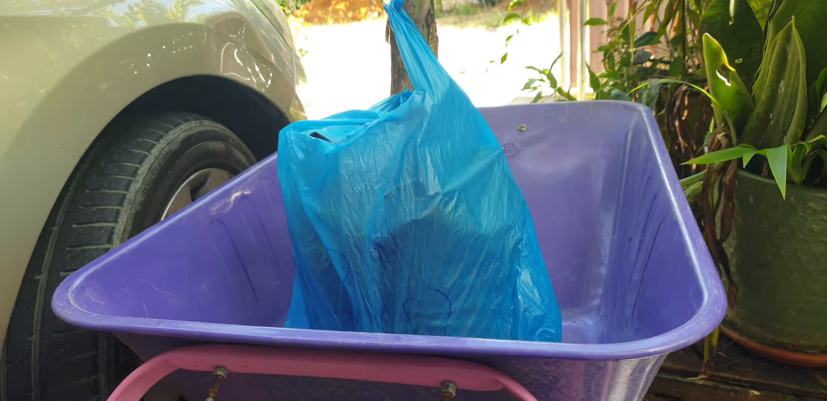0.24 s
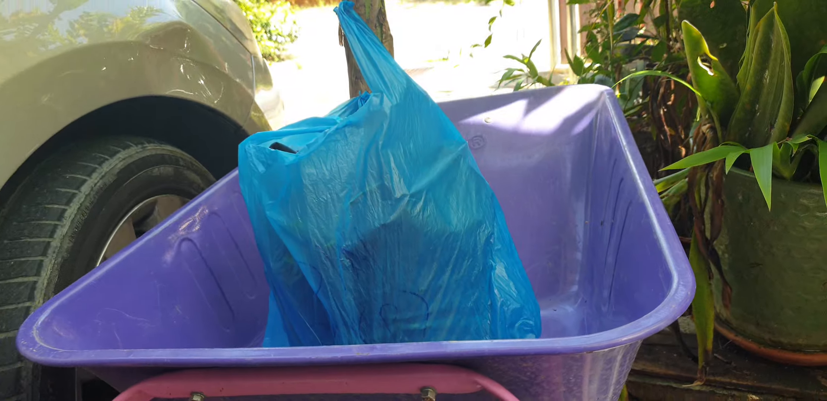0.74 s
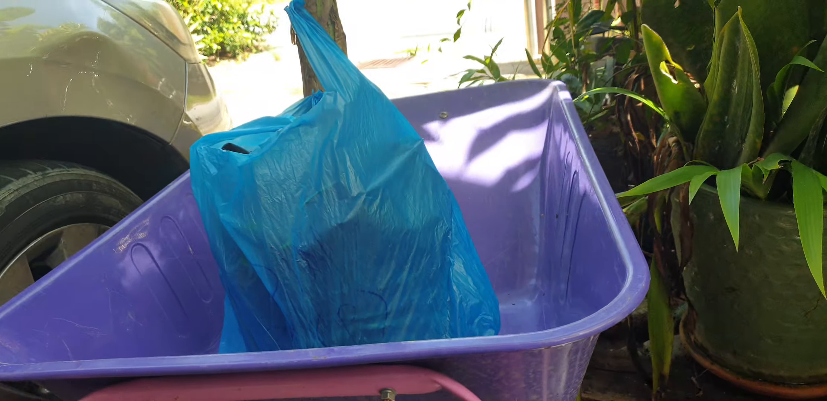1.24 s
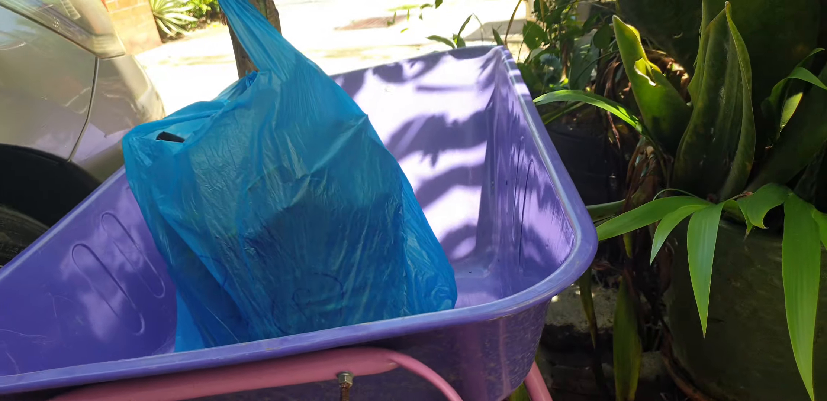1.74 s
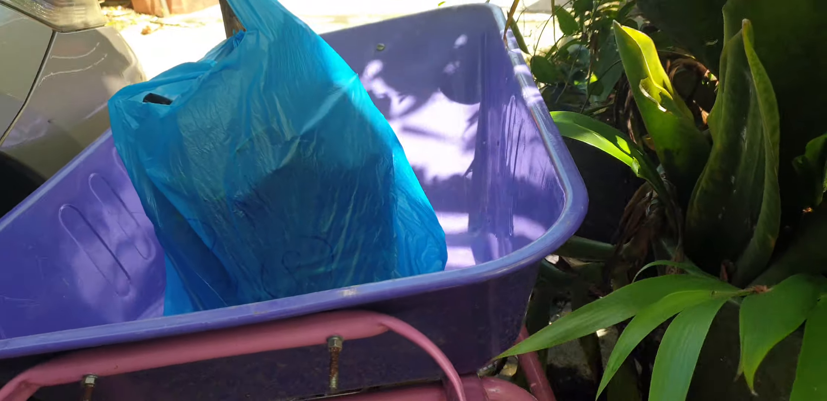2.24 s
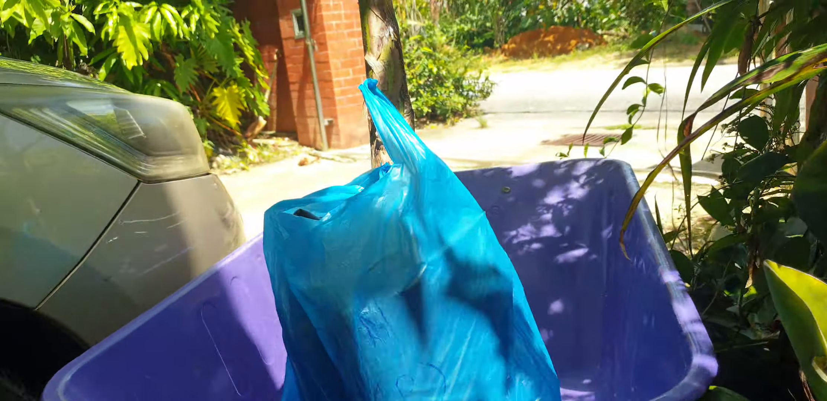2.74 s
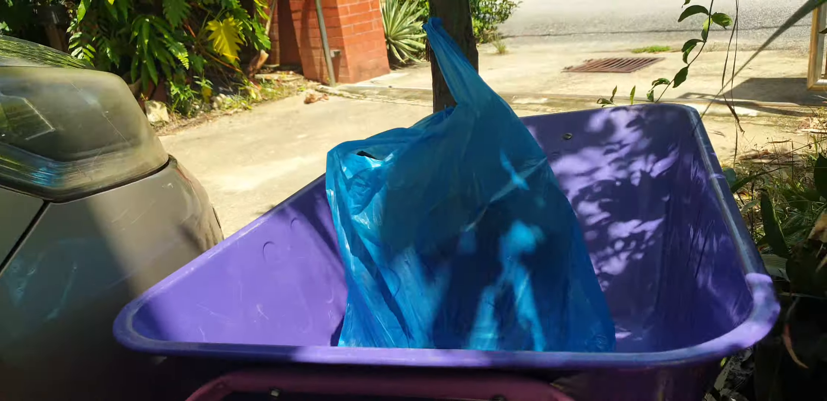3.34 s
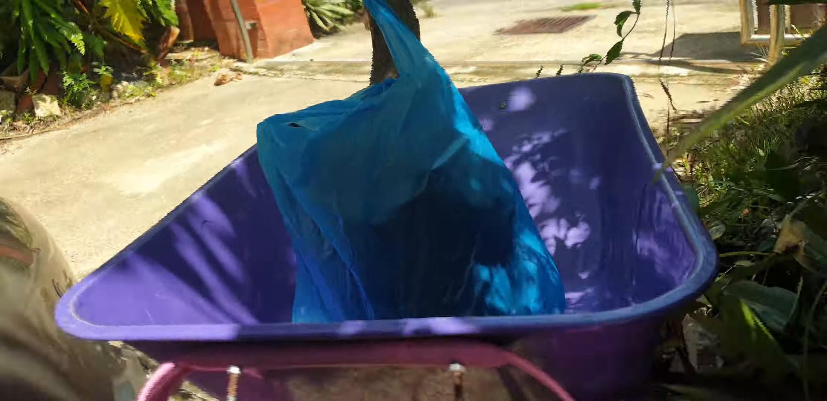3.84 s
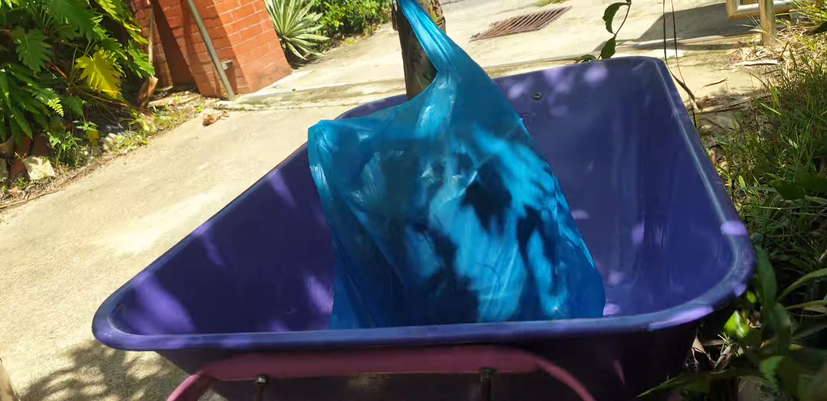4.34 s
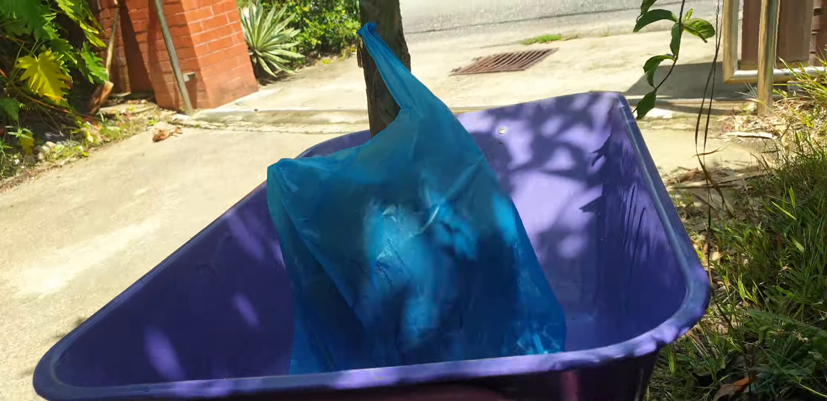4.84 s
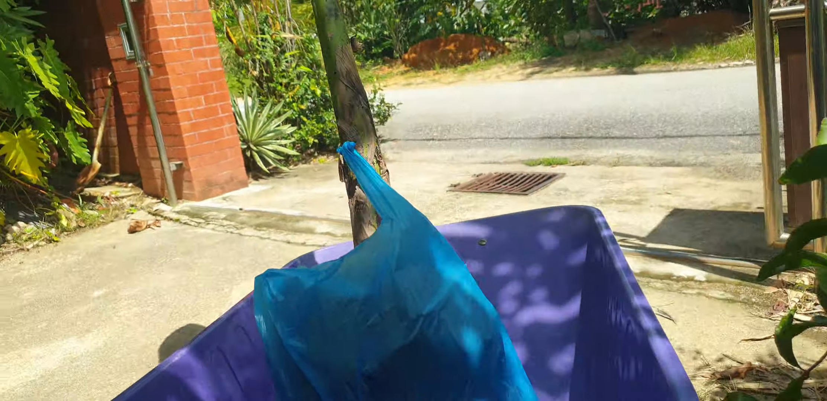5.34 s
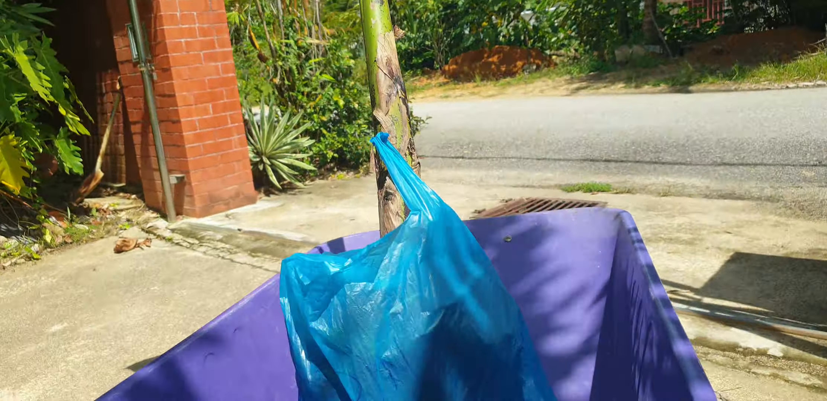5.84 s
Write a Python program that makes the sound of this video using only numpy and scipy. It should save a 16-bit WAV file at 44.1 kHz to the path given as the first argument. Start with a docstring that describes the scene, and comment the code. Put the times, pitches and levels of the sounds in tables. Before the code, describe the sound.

Close outdoor sound of a loaded barrow rolling: sparse grit crackle and scuffing steps under a faint hiss, with dull bumps on the handles. Two hard jolts, about one second apart, make the metal tray clang and drum with low rumble. A leg scrapes hoarsely, a finger rubs the microphone and snaps away, then lighter crunching and ticks continue.

```python
"""Grit crunches under tyre and shoes and a steel tray drums, as a loaded wheelbarrow is pushed over concrete.
Heard from a hand-held phone behind it, the wheel's drops and road jolts excite tray resonances and notes.
Grit is gated noise in three grain sizes, with short rings for single stones; a steel leg scrapes once.
The hand adds decaying knocks, a finger rub and low rumble, over a faint hum, squeaks and outdoor hiss."""
import sys
import numpy as np
from scipy import signal
from scipy.fft import rfft, irfft, next_fast_len
from scipy.io import wavfile
from scipy.ndimage import uniform_filter1d, map_coordinates

SR = 44100
rng = np.random.default_rng(int(sys.argv[2]) if len(sys.argv) > 2 else 0)


def file_out(sig):
    """Save sig as 16-bit WAV at sys.argv[1]."""
    # one column per channel
    cols = np.atleast_2d(sig).T
    # limit, then scale
    lim = np.clip(cols, -1, 1)
    pcm = np.round(lim * 32767).astype(np.int16)
    wavfile.write(sys.argv[1], SR, pcm)


N = 268128

# Levels in the tables are relative: each layer adds its own trim.
# rough road that shakes the tray: peak t/s, rise/s, low-mode T60/s, low modes level/dB, upper modes level/dB,
# first note level/dB, second note level/dB, higher notes level/dB
ROUGH_PATCHES = [(0.491, .03, 0.69, -47, -62, -40.5, -57, -75), (2.89, .015, .6, -34, -55, -60, -60, -72),
                 (2.974, 0.0089, 0.42, -22.5, -18.5, -47, -36, -34),
                 (3.02, .03, 0.59, -27.5, -32, -39, -37, -36),
                 (3.064, .02, 0.53, -30.5, -30, -47, -45, -50),
                 (3.171, 0.025, 0.52, -29.5, -45, -54, -34, -49),
                 (3.249, 0.044, 0.33, -36, -61, -34, -42, -44.5),
                 (3.312, .05, 0.69, -46, -58, -31, -45.5, -62),
                 (3.411, 0.023, 0.66, -32, -42, -35.5, -39.5, -48.5),
                 (3.47, .04, 0.44, -46, -53, -43, -52, -60), (3.576, .01, 0.17, -41, -56, -50, -59, -63),
                 (3.841, 0.01, 0.41, -17.5, -25, -19, -27.5, -39),
                 (3.95, 0.059, 1, -26.5, -32.5, -29.5, -39, -39),
                 (4.066, 0.09, 0.41, -22.5, -42, -29, -33, -39.5),
                 (4.115, .03, 0.67, -30, -52, -29, -31, -55), (4.29, 0.018, .6, -29.5, -47, -52, -50, -55),
                 (4.364, 0.13, 0.69, -31, -42, -39, -32, -38),
                 (4.492, 0.0075, 0.13, -31, -42, -49, -36, -43),
                 (4.636, 0.014, 0.85, -39, -48, -64, -50.5, -71),
                 (4.72, 0.036, 0.44, -39, -49, -60, -55, -67)]
# wheel drops over joints: t/s, level/dB, upper modes re level/dB, note f/Hz, note re level/dB
WHEEL_DROPS = [(0.472, -41, -25.5, 340, 0), (2.965, -21, 3.5, 337, 10), (2.971, -8.5, -5, 468, -2),
               (2.98, -13, -13, 329, -17), (3.164, -23, -23, 320, -4), (3.391, -33, -9, 408, 3.5),
               (3.832, -14, -30, 441, -1.5), (3.841, -18.5, -4, 425, 5.5), (3.883, -25.5, -12, 346, 3),
               (3.93, -13, -27, 464, -11), (4.058, -21, -3, 331, 5)]
# single stones cracking, and from about 4.77 to 4.88 s the sharp clicks of the finger rubbing over the right
# port: t/s, level/dB, larger stones re level/dB, dust re level/dB, left-right/dB, # ring f/Hz, ring re level/dB
CRACKS_AND_CLICKS = [(0.2364, -36, -14, -21, -7, 5300, -15), (0.537, -28.5, -17, -4, -9, 4440, -10),
                     (0.5691, -30.5, -13, -3, -16, 5840, -24), (0.851, -26.5, 0, -15, 3, 2030, -7),
                     (0.862, -28, 0, -17, 0, 2000, -3), (0.898, -35, 8, -17, -3.0, 1910, 0),
                     (0.909, -32, 10, -17, -1, 1890, 2), (0.984, -40.5, 0, -17, -7, 1480, 4),
                     (1.0249, -34, 10, -14, -6, 1330, 3.5), (1.2496, -40, -3, -18, -6, 1900, -6),
                     (1.3389, -24.5, -16, -25, 2.5, 5250, -9), (1.5254, -34, -4, -6, -0.5, 5400, -5),
                     (1.552, -33, -15, -17, -1.5, 5350, -10), (2.0423, -26, 5, -14, -9, 2940, 3),
                     (2.0674, -24, -13, -15, -5, 2020, 5), (2.1124, -37, -3, -15, -4.0, 1540, -7),
                     (2.1825, -33, -20, -17, -5.0, 4600, -5), (2.4799, -19.5, -4, -22, 1, 5100, -9),
                     (2.5272, -25.5, -21, -2, -4.0, 5170, -7), (2.863, -28, 15, -25, -11, 2480, -10),
                     (2.911, -22.5, -1, -29, -4.5, 2390, -1), (2.975, -17.5, 1, -8, -4, 5680, 1.5),
                     (3.0964, -22.5, 2, -16, -2.5, 1270, -1), (3.5328, -22, -2, -20, -3, 1420, -7.5),
                     (3.647, -29, -4, -17, 0, 2410, 0), (3.675, -32, -3, -14, -10, 1820, 4),
                     (3.6997, -33.5, 13, -14, -1, 1377, 13), (3.7886, -24, -5, -8, -1, 2010, -10),
                     (3.919, -14, -7, -12, 6, 4840, -13), (4.209, -37.5, 14, -8, -4, 1390, 1),
                     (4.2745, -31.5, 6, -17, -4, 2100, 4), (4.492, -41, 9, -11, -9, 1560, 4),
                     (4.5258, -27, -11, -1, -2, 5240, -10), (4.569, -30, -7, -4, -2, 2040, -5),
                     (4.636, -30, -6, -12, -4, 6060, -12), (4.734, -30, -2, -24, -18.5, 3470, -7),
                     (4.775, -26, 4, -27, -18, 1200, -6), (4.7885, -25, -12, -18, -16, 4500, -8),
                     (4.802, -25, -6, -8, -20, 1405, -7), (4.807, -27.5, 5, -28, -17, 4390, -12),
                     (4.82, -20.5, -13, -28, -25.5, 1200, -15), (4.8277, -25.5, -1, -27, -23, 1210, -9),
                     (4.8353, -21.5, -8, -25, -25, 1290, -2), (4.8718, -8.5, -6, -35, -21, 4500, -24),
                     (4.8745, -34, -5, -16, -17, 5030, -9), (5.167, -18, -20, -13, -5, 5510, -9),
                     (5.2096, -20, -19, -10, -6, 5000, -3), (5.545, -47, 5, -15, -5, 3860, -4),
                     (5.5586, -20, -3, -10, -3, 1730, -1.5), (5.5894, -25, -3, -17, -7, 2270, -4),
                     (5.616, -30.5, 4, -19, -5.0, 1400, -4), (5.626, -37, 0, -19, -5, 1340, 11),
                     (5.636, -44, 0, -19, -5, 1380, 6), (5.6731, -22, 6, 0, -9, 5350, -8),
                     (5.741, -37, -13, 8, -5, 5300, -15), (5.8119, -33, -2, -17, -6, 2740, 0),
                     (5.86, -33.5, -16, -23, -4, 4700, -1), (6.0351, -31, 9.5, -22, 0, 1550, -11),
                     (6.0648, -30, -18, -24, -7.5, 5600, -9)]


def amp(db):
    """Gain of a level in dB."""
    return 10 ** (np.asarray(db) / 20)


def unit(x):
    """Scaled to rms 1."""
    return x / np.sqrt(np.mean(np.abs(x) ** 2) + 1e-20)


def along(points, hz):
    """Interpolates (Hz, value) points on a log frequency axis."""
    f, v = np.transpose(points)
    return np.interp(np.log(hz + 1), np.log(f + 1), v)


def curves(rows):
    """One value per sample for each column after the time."""
    s, *cols = np.transpose(rows)
    return [np.interp(np.arange(N) / SR, s, c) for c in cols]


def wobble(rate):
    """A smooth random curve, rate knots a second."""
    knots = rng.standard_normal(int(N * rate / SR) + 4)
    return map_coordinates(knots, [np.arange(N) * rate / SR])


def sides(pan_db):
    """Left and right gains for a left-right difference."""
    return amp(np.array([pan_db / 2, -pan_db / 2]))


def swells(s, rise, t60):
    """One envelope per event: a steady climb of 30 dB over the rise before its peak, then a decay."""
    t = np.arange(N) / SR - s[:, None]
    return amp(np.where(t < 0, 30 * t / rise[:, None], -60 * t / t60[:, None]))


def pooled(db, envelopes):
    """Events of these levels added in power."""
    return np.sqrt(amp(2 * db) @ envelopes ** 2)


def filtered(x, response):
    """Filters x by a complex response of frequency."""
    m = next_fast_len(N + SR)
    return irfft(rfft(x, m) * response(np.fft.rfftfreq(m, 1 / SR)), m)[..., :N]


def noise(spectrum, gate=1, alike=None, patchy_db=1.0):
    """Stereo noise of rms 1 in patches of random gain, gated before colouring, partly alike on both sides."""
    # left-right likeness by band: f/Hz, correlation (0 to 1)
    usual_likeness = [(60, 0.44), (130, 0.55), (290, 0.9), (640, 0.53), (1400, 0.13), (3000, 0.019)]
    likeness = usual_likeness if alike is None else alike
    z = signal.stft(rng.standard_normal((2, N)), nperseg=256)[2]
    field = uniform_filter1d(rng.standard_normal(z.shape[1:]), size=3, axis=0)
    field = uniform_filter1d(field, size=6, axis=1)
    patches = z * amp(patchy_db * unit(field))
    pair = gate * signal.istft(patches, nperseg=256)[1][:, :N]

    def colour(hz):
        angle = np.arccos(np.clip(along(likeness, hz), 0, 1)) / 2
        return amp(along(spectrum, hz)) * [np.cos(angle), np.sin(angle)]

    mid, side = filtered(pair, colour)
    return unit(np.array([mid + side, mid - side]))


def ringing(x, modes, spread):
    """Stereo x through resonances; each mode reaches the two ports with its own phase."""
    shift = np.exp(1j * spread * rng.standard_normal((len(modes), 2, 1)))

    def body(f):
        return sum(p * amp(db) * 1j * f * width / (centre ** 2 - f * f + 1j * f * width)
                   for p, (centre, width, db) in zip(shift, modes))

    return filtered(x, body)


def tray():
    """Small jolts from the road and a few hard drops drive the modes of the steel tray."""
    # steady jiggle of the rolling tray: t/s, low modes level/dB, upper modes level/dB
    jiggle = [(0.0, -52.5, -58), (0.42, -54.5, -56.5), (1.59, -55.5, -59), (2.3, -61, -52.5),
              (2.8, -55.5, -64.5), (3.75, -57, -59), (4.88, -50.5, -60), (5.3, -54, -60),
              (6.08, -54.5, -55.5)]
    # low modes of tray and frame: f/Hz, width/Hz, level/dB
    low_modes = [(132, 35, -5), (171.7, 3.3, -8.5), (211, 29, -6), (242.4, 8, -2), (273.4, 20.5, -3),
                 (326, 35, -8.5), (371, 11, -9), (424.4, 4.3, -5.5), (479.6, 6.4, -10)]
    # upper modes of tray and frame: f/Hz, width/Hz, level/dB
    upper_modes = [(568, 26, -4), (615.4, 6.5, 1), (688, 26, -1.5), (734, 12, -18), (830, 35, -8),
                   (885, 22, -11), (930, 4.3, -3), (985, 12, -4), (1065, 6.7, -3), (1133, 7.3, -11),
                   (1200, 7.6, -12), (1340, 19, -21.5), (1570, 6.7, -26), (1710, 16, -11), (2345, 20, -18)]
    at, rise, t60, low_db, upper_db, *_ = np.transpose(ROUGH_PATCHES)
    rough = [pooled(low_db, swells(at, rise, t60)),
             pooled(upper_db, swells(at, rise, t60 / 1.2))]  # upper modes fade 1.2 times as fast
    drive = np.hypot(amp(curves(jiggle)), rough)
    jolts = noise([(100, 0)], amp(2.5 * wobble(70)), patchy_db=0)  # flat spectrum
    low = jolts * drive[0] * amp(24.0)
    high = jolts * drive[1] * amp(20.0)
    t = np.arange(SR // 20) / SR
    for s, db, high_db, *_ in WHEEL_DROPS:
        blow = amp(-60 * t / 0.025) * rng.standard_normal((2, len(t)))  # the load lands in a short shudder
        low[:, round(s * SR):][:, :len(t)] += amp(db + 21) * blow[0]
        high[:, round(s * SR):][:, :len(t)] += amp(db + high_db + 30.5) * blow[1]
    drum = ringing(low, low_modes, spread=0.54) * sides(-1.9)[:, None]
    sheet = ringing(high, upper_modes, spread=1.93) * sides(-5.5)[:, None]
    return drum + sheet


def thuds():
    """Each drop also sounds the tray where the load lands, one short woody note."""
    out, t = np.zeros(N + SR), np.arange(SR // 5) / SR
    for s, db, _, hz, note_db in WHEEL_DROPS:
        envelope = amp(db + note_db - 60 * t / 0.072) * (1 - np.exp(-t / 0.0027))
        out[round(s * SR):][:len(t)] += envelope * np.sin(2 * np.pi * hz * t)
    return out[:N]


def singing():
    """Lightly damped tray-floor notes, kept unsteady by the road; higher ones differ more between ports."""
    # clearest notes of the tray floor: f/Hz, level/dB
    floor_notes = [(209.5, -0.5), (316.6, 1), (661, -2), (776, -6), (1010, -3), (1183, -7)]
    out, t = np.zeros((2, N)), np.arange(N) / SR
    s, rise, t60, _, _, first_db, second_db, higher_db = np.transpose(ROUGH_PATCHES)
    shapes = swells(s, rise, t60 * 0.9)  # slightly shorter than the low modes
    note_levels = [first_db, second_db] + [higher_db] * len(floor_notes)
    for (hz, db), level_db in zip(floor_notes, note_levels):
        port_phase = hz / 700 * np.array([[.5], [-.5]])
        phase = 2 * np.pi * hz * t + 0.55 * wobble(22) + port_phase
        out += pooled(level_db, shapes) * amp(db + 3.0 + 2.5 * wobble(30)) * np.sin(phase)
    return out


def crunch():
    """Grit breaks in uneven grains: a steady bed, sliding shoes, single cracks and the finger's clicks share
    three grain sizes."""
    # bed of grit under tyre and shoes: t/s, small grit level/dB, larger stones re grit/dB, dust re grit/dB
    grit_bed = [(0.0, -52, -9, -17), (0.01, -48.5, 10.5, 14.5), (0.2, -54, -4, -7), (1.29, -56.5, 1, -2.5),
                (1.54, -52, 0, -2), (2.79, -46, -7.5, -3.5), (3.01, -44, -1, -6.5), (3.37, -51.5, -8, -1.5),
                (3.89, -42.5, 1.5, -5.5), (4.21, -60, -1, 2), (4.38, -71, 15, -3), (4.61, -50, -7, -0.5),
                (4.88, -48, 3.5, -8), (4.89, -49.5, -6.5, -7), (5.25, -43, -3, -5.5),
                (5.5, -56.5, -3.5, -5), (5.55, -51.5, -2, -3.5), (6.08, -57, -1.5, -5)]
    # shoes sliding on the concrete: t/s, level/dB, larger stones re level/dB, dust re level/dB,
    # left-right/dB, length/s, fade time constant/s
    shoe_slides = [(0.0094, -24, -0.5, -12, -2.5, 0.087, 0.58), (0.1, -39, -3, -16, -4, 0.03, 0.1),
                   (0.824, -48, 10, -17, -1, 0.054, 0.12), (1.456, -39.5, 2.5, -15, -4, 0.026, 0.093),
                   (1.5472, -21, -6, -8, -1.5, 0.083, 0.18), (2.0453, -26, -2, -5, -4.5, 0.07, 0.23),
                   (2.116, -34, 5, -17, -2.5, 0.041, 0.12), (2.9655, -16, 0.5, 0, -1.5, 0.046, 0.033),
                   (3.157, -37, -20, 6.5, -4, 0.079, 0.13), (3.1967, -33, -18.5, -11, -6, 0.048, 0.12),
                   (3.677, -44, 7, -17, -5, 0.072, 0.11), (3.831, -19, -5.5, -4.5, -2.5, 0.04, 0.053),
                   (3.891, -25, -7, -3.5, -4.5, 0.047, 0.1), (3.95, -33.5, -14, -4, -6, 0.056, 0.2),
                   (4.064, -29.5, -19, 0.5, -6.5, 0.026, 0.072), (4.275, -38, 6, -4, -2.5, 0.15, 0.12),
                   (4.771, -38, -8, -20, -17, 0.077, 0.12), (5.14, -32.5, -21, -5, -4, 0.065, 0.049),
                   (5.2055, -24, -11, -3.5, -4, 0.047, 0.09), (5.273, -34, -25, -1.5, -4, 0.048, 0.074),
                   (5.5614, -32.5, 2, -9, -2.5, 0.16, 0.14)]
    # spectrum of small grit: f/Hz, level/dB
    small_grit = [(1500, -24.5), (2500, -3), (3500, -0.5), (6000, 0), (7500, -5.5), (9000, -12),
                  (12000, -29)]
    # spectrum of larger stones: f/Hz, level/dB
    larger_stones = [(350, -10.5), (800, -6), (1300, 0), (2200, 0), (3200, -7.5), (5000, -8.5), (8000, -24)]
    # spectrum of the finest dust: f/Hz, level/dB
    finest_dust = [(6000, -20), (7500, -5), (10000, 1.5), (16000, -10)]
    spectra = (small_grit, larger_stones, finest_dust)

    grit_db, stones_db, dust_db = curves(grit_bed)
    size_db = grit_db + np.array([0 * grit_db, stones_db, dust_db])
    bed_level = amp(size_db + 3.0)[:, None] * sides(-4)[:, None]
    swell = 2.05 * wobble(60) + 0.62 * wobble(20)
    bed = bed_level * [noise(s, amp(swell + 0.85 * wobble(600)), patchy_db=3) for s in spectra]

    power, t = np.zeros((3, 2, N)), np.arange(SR // 4) / SR
    slides = [(row[:5], amp(-6.0) * np.exp(-(t / row[5]) ** 5 - t / row[6])) for row in shoe_slides]
    cracks = [(row[:5], amp(-60 * t / 0.0069)) for row in CRACKS_AND_CLICKS]
    for (s, db, stones_db, dust_db, pan), shape in slides + cracks:
        at = round(s * SR)
        burst = (sides(pan)[:, None] * shape * (1 - np.exp(-t / 0.00074)))[:, :N - at]
        level = amp(db + np.array([0, stones_db, dust_db]))[:, None, None]
        power[..., at:at + len(t)] += (level * burst) ** 2  # grains add in power
    grains = amp(2.2 * wobble(500))
    sizes = [noise(s, grains, patchy_db=3.0) for s in spectra]
    return np.sum(bed + np.sqrt(power) * sizes, axis=0)


def pings():
    """Each cracking stone, and each click of the rubbing finger, also rings for an instant at its own pitch."""
    out, t = np.zeros((2, N + SR)), np.arange(SR // 20) / SR
    for s, db, _, _, pan, hz, ring_db in CRACKS_AND_CLICKS:
        phase = 2 * np.pi * (hz * t + rng.random((2, 1)))
        envelope = amp(db + ring_db - 60 * t / 0.02) * (1 - np.exp(-t / .0005))
        out[:, round(s * SR):][:, :len(t)] += envelope * sides(pan)[:, None] * np.sin(phase)
    return out[:, :N]


def scrape():
    """A steel leg catches on the concrete, drags and lifts: a hoarse ring under a band of hiss."""
    # what the leg rings with: f/Hz, width/Hz, level/dB
    leg_modes = [(787, 16, -3), (1009, 16, 4), (1170, 13, -3), (1480, 120, -20), (2570, 330, -19)]
    # spectrum of its thin hiss: f/Hz, level/dB
    hiss_spectrum = [(4300, -32), (5100, -5), (5700, 1.5), (6300, -7), (7200, -18)]
    t = np.arange(N) / SR - 4.282  # seconds from the catch

    def drag(length_s, t60_s):
        return np.clip(t / 0.028, 0, 1) * amp(-60 * np.maximum(t - length_s, 0) / t60_s)

    chatter = amp(2.0 * wobble(90))
    ring = unit(ringing(noise([(100, 0)], chatter, patchy_db=1), leg_modes, spread=1.35))
    hiss = noise(hiss_spectrum, chatter, patchy_db=0.0)
    ring = amp(-36.5) * drag(length_s=0.11, t60_s=0.33) * ring
    hiss = amp(-39.5) * drag(length_s=0.082, t60_s=0.13) * hiss
    return (ring + hiss) * sides(-6)[:, None]


def knocks():
    """Each contact is a short snap of pressure and a few cycles of one low pitch."""
    # dull knocks on phone and handles: t/s, level/dB, f/Hz, left-right/dB, T60/s, snap re level/dB
    contacts = [(0.173, -35, 396, 6, 0.049, -25), (0.233, -38.5, 102, -4, 0.028, -7),
                (0.33, -44.5, 102, 3, 0.023, -3), (0.571, -31, 163, -4, 0.041, -22),
                (0.614, -34.5, 291, 9, 0.046, -13), (0.828, -35, 337, 6, 0.049, -9.5),
                (0.897, -32, 380, 8.5, 0.049, -14), (0.935, -27, 127, -18.5, 0.054, -19.5),
                (0.949, -24.5, 303, 6, 0.055, -15), (1.022, -19.5, 374, 8, 0.028, -26.5),
                (1.291, -35.5, 309.6, 5, 0.048, -15.5), (1.314, -32.5, 170, 1, 0.04, -13),
                (1.397, -27.5, 139.8, -16, 0.045, -21), (1.43, -31.5, 102, -5, 0.053, -10),
                (1.643, -40, 102.4, -6.0, 0.035, -9), (2.037, -36, 295, -3.5, 0.057, -14),
                (2.711, -41, 102, -22, 0.032, -25), (2.864, -13.5, 112, -22.5, 0.032, -26.5),
                (3.574, -24, 294, 8, 0.031, -27), (4.493, -14, 101, -25, 0.02, -16.5),
                (4.634, -18.5, 103, -20, 0.023, -20), (4.772, -21, 272, -23, 0.03, -16.5),
                (4.818, -25, 447, -21, 0.037, -25), (4.833, -16, 800, -26, 0.028, -28),
                (4.846, -22.5, 403, -18, 0.079, -19), (5.779, -32, 120, 5, 0.041, -17),
                (5.897, -39, 102, -4.5, 0.025, -14), (5.904, -25, 101, -23.5, 0.018, -24.5),
                (5.945, -28, 102, -8, 0.038, -13), (6.034, -33.5, 101, -7, 0.035, -12)]
    out, t = np.zeros((2, N + SR)), np.arange(SR // 5) / SR
    for s, db, hz, pan, t60, snap_db in contacts:
        push = np.sin(2 * np.pi * hz * t) * amp(-60 * t / t60) * (1 - np.exp(-(t / 0.0021) ** 2))
        push -= amp(snap_db + 12) * np.exp(-((t - .0012) / 0.00043) ** 2)
        out[:, round(s * SR):][:, :len(t)] += amp(db + 1.5) * sides(pan)[:, None] * push
    return out[:, :N]


def rub():
    """A finger's skin sticks and slips over the right port, ever harder, then lets go at once."""
    # spectrum of the dragging finger: f/Hz, level/dB
    skin_spectrum = [(71, -32), (120, -5.5), (473, 6), (602, -4), (777, -2), (1320, -12.5), (1470, -13),
                     (2500, -25), (3250, -56), (5500, -120)]
    start_s, end_s, let_go_s = 4.754, 4.865, 0.0067
    start_db, growth_db_per_s = -33.5, 175
    t = np.arange(N) / SR
    slips = amp(3.5 * wobble(200))
    growth = amp(start_db + growth_db_per_s * (np.minimum(t, end_s) - start_s))
    release = np.exp(-(np.maximum(t - end_s, 0) / let_go_s) ** 2)
    press = (t > start_s) * growth * release
    return press * noise(skin_spectrum, slips) * amp([[-22], [0]])  # left far quieter than right


def rumble():
    """The walk shakes the phone in lumps that differ from port to port."""
    # low rumble through the hand and the ports: t/s, level/dB
    steady = [(0, -43), (.8, -46), (1.8, -46.5), (2.5, -37), (2.66, -55), (3.05, -21), (3.4, -38),
              (3.75, -68), (3.95, -32), (4.3, -35), (4.9, -39.5), (5.5, -38.5), (6.08, -42)]
    # lurches of the hand that swell the rumble: t/s, level/dB, left-right/dB, half length/s
    hand_lurches = [(0.338, -43, -15, 0.023), (0.501, -31.5, -9.5, .03), (0.552, -34, -14, .03),
                    (0.968, -35, -13, .04), (1.415, -37.5, -10, 0.064), (1.662, -36, -14, 0.02),
                    (1.797, -34.5, -12, 0.034), (1.93, -37, -6, 0.034), (2.553, -40.5, -7, 0.05),
                    (2.73, -35.5, -30, 0.023), (2.917, -22.5, -2, 0.027), (2.987, -15.5, -8, 0.019),
                    (3.186, -28, -17, 0.035), (3.5, -34.5, -10, 0.08), (3.88, -19, -6, 0.038),
                    (4.007, -29, -22, 0.022), (4.087, -18, -6, 0.031), (4.502, -26, -11, 0.021),
                    (4.563, -32, -22, 0.032), (4.666, -27.5, -30.5, .03), (4.782, -31, -24, .04),
                    (4.963, -34, -18, 0.019), (5.176, -33, -2, .03), (5.286, -32, 0, 0.022),
                    (5.925, -34, -16, 0.047), (6.044, -30.5, -9, 0.029)]
    # spectrum of the rumble: f/Hz, level/dB
    low_spectrum = [(12, -45), (25, 5), (45, 6), (62, 4.5), (98, -1), (170, -9.5), (220, -13.5),
                    (370, -120)]
    s, db, pan_db, half = np.transpose(hand_lurches)
    bumps = np.exp(-((np.arange(N) / SR - s[:, None]) / half[:, None]) ** 2)
    lurch = [pooled(db + side * pan_db / 2, bumps) for side in (1, -1)]
    level = np.hypot(amp(curves(steady)[0]) * sides(-5.5)[:, None], lurch)
    lumps = amp(1.5 * wobble(14))
    shaking = noise(low_spectrum, lumps, alike=[(40, 0.062), (120, 0.73)], patchy_db=0.5)
    return amp(-5.0) * level * shaking


def squeaks():
    """Brief thin sine tones that swell, rise slightly in pitch and fade."""
    # squeaks: t/s, length/s, f/Hz, level/dB, rise/Hz
    thin_tones = [(1.766, 0.11, 1456, -54, 5), (3.196, 0.036, 6070, -32.5, 130)]
    out, t = np.zeros(N), np.arange(N) / SR
    for s, length, hz, db, rise_hz in thin_tones:
        done = np.clip((t - s) / length, 0, 1)
        phase = 2 * np.pi * np.cumsum(hz + rise_hz * done) / SR
        out += amp(db) * np.sin(np.pi * done) * np.sin(phase)
    return out * sides(-8.5)[:, None]


def hum():
    """A low sine whose pitch and level drift and waver, silent after its last point."""
    # course of the hum, before wavering: t/s, f/Hz, level/dB
    hum_course = [(0.0, 81.6, -48), (0.09, 86.3, -49), (2.58, 87, -59), (2.76, 87.3, -43),
                  (2.97, 107.2, -44), (3.29, 110.2, -44), (3.41, 87.4, -51), (3.75, 88.4, -68),
                  (3.9, 94, -37), (4.04, 81.8, -45), (4.13, 97.4, -51), (4.55, 82.2, -56),
                  (4.74, 101.5, -35.5), (5.3, 106, -52), (5.6, 108.4, -78)]
    hz, db = curves(hum_course)
    level = amp(db + 1.5 + 1.65 * wobble(10))
    phase = 2 * np.pi * np.cumsum(hz + 1.54 * wobble(13)) / SR
    sounding = np.arange(N) / SR < hum_course[-1][0]
    return level * np.sin(phase) * sounding * sides(-8.5)[:, None]


def air():
    """Outdoor hiss: coloured noise with a slowly wavering level."""
    # spectrum of the hiss: f/Hz, level/dB
    hiss_colour = [(40, -24), (90, 0), (170, -15.5), (400, -19.5), (800, -22.5), (2700, -28), (6000, -23.5),
                   (11000, -47), (16000, -55)]
    return amp(-56 + 0.65 * wobble(3.97)) * noise(hiss_colour)


def scene():
    """All sources over the outdoor hiss."""
    barrow = tray() + thuds() + singing() + scrape()
    ground = crunch() + pings()
    hand = knocks() + rub() + rumble()
    return barrow + ground + hand + squeaks() + hum() + air()


def record(dry):
    """The ports peak near 5.5 and 11.5 kHz, dip near 8 kHz and keep nothing above the band limit."""
    # response of the ports: f/Hz, level/dB
    port_response = [(20, -27), (50, 1), (3000, -2), (4300, -1.4), (5500, 2), (6200, -2), (7000, -8.5),
                     (8100, -16.5), (9500, -8), (11500, 2), (13500, -0.5), (16000, -5)]
    band_limit_hz = 15950
    return filtered(dry, lambda hz: amp(along(port_response, hz)) * (hz < band_limit_hz))


dry = scene()
out = record(dry)
file_out(out)
```